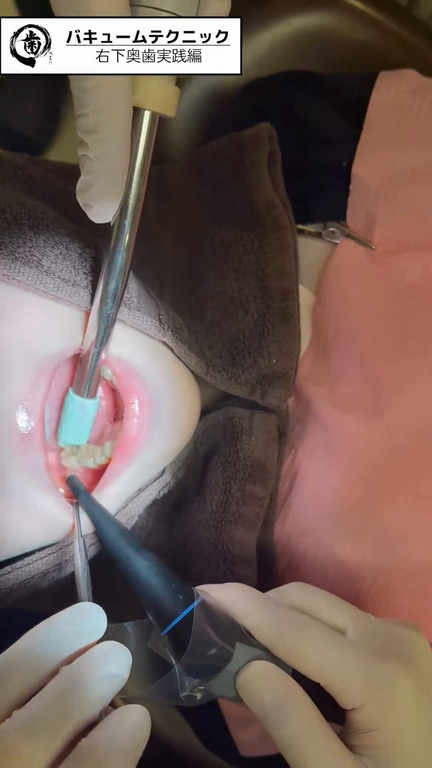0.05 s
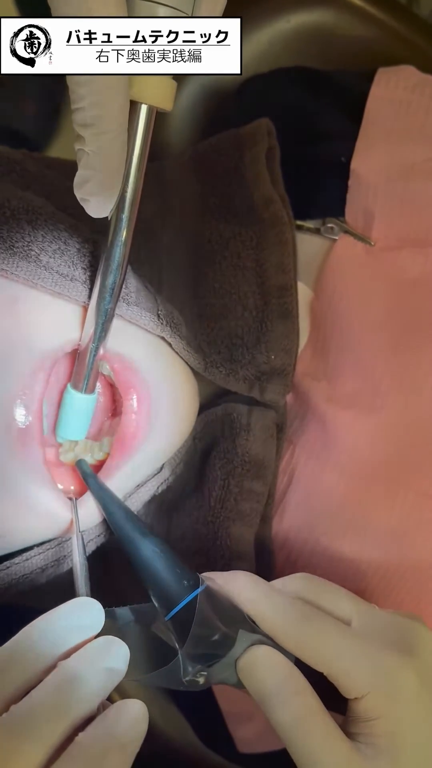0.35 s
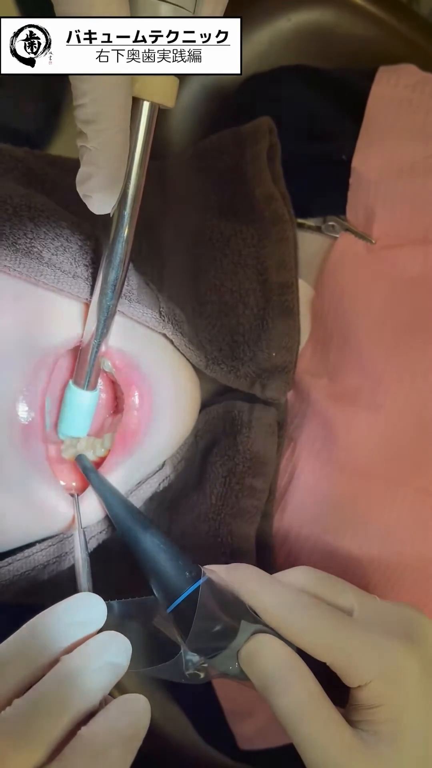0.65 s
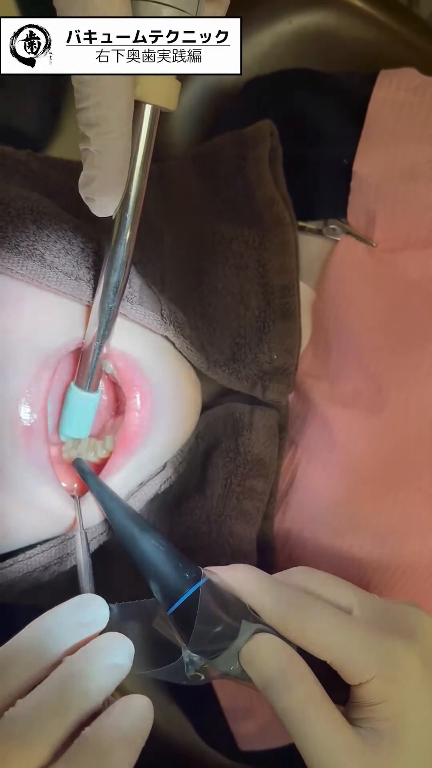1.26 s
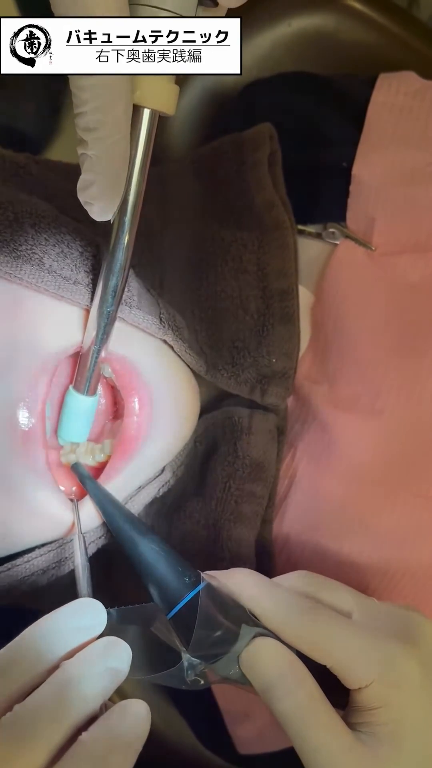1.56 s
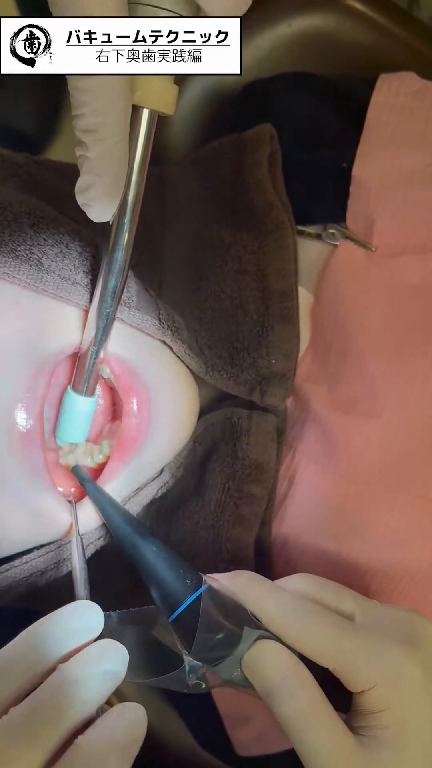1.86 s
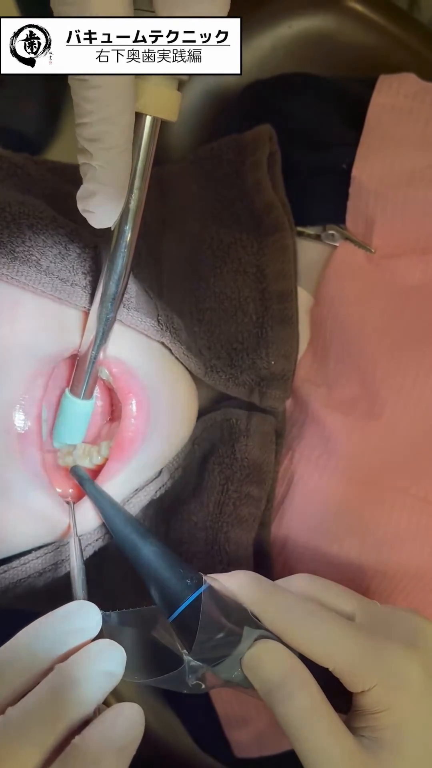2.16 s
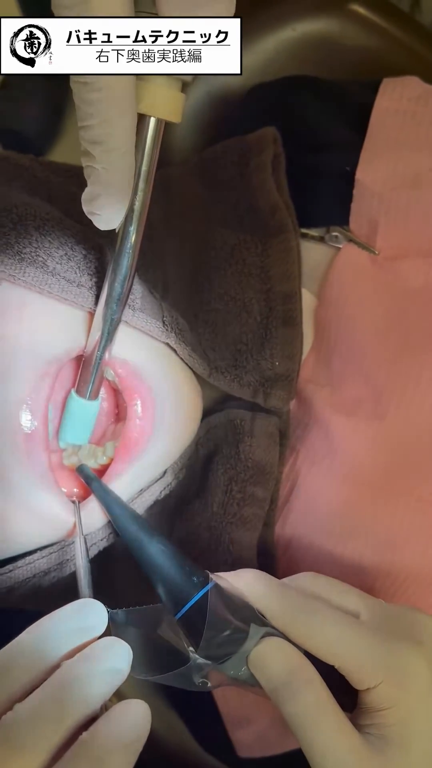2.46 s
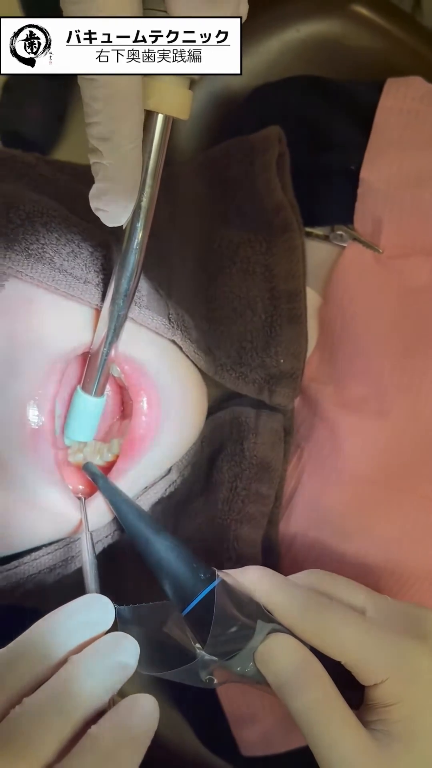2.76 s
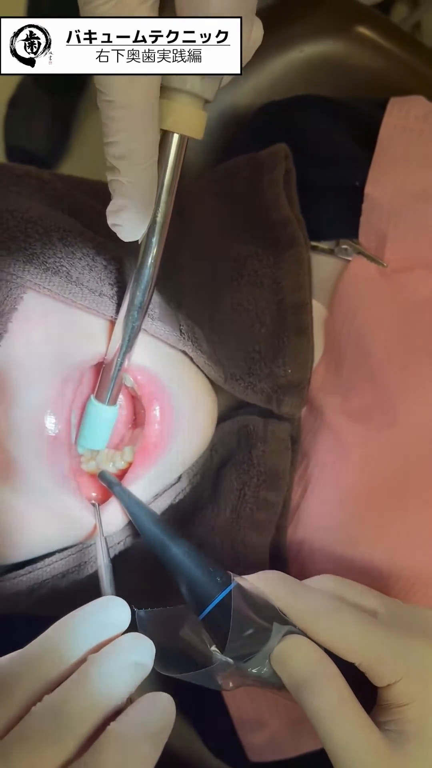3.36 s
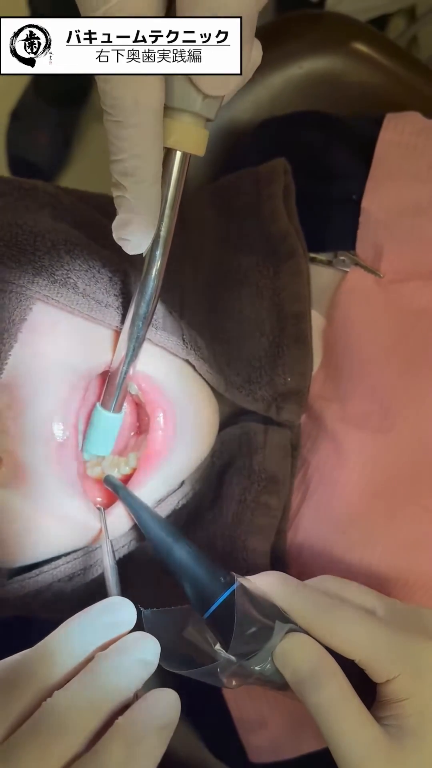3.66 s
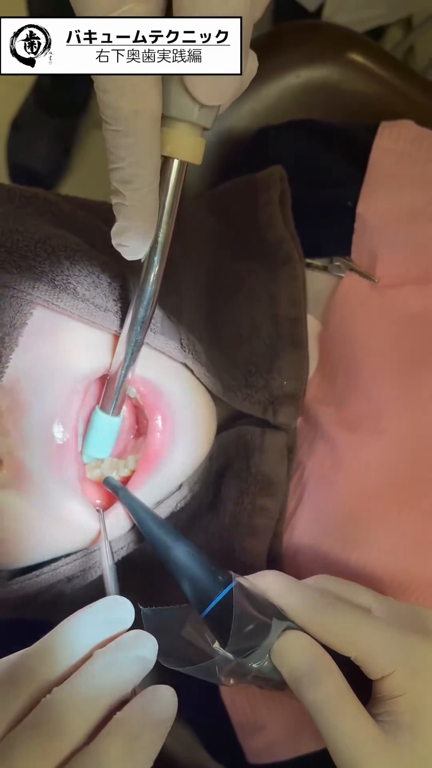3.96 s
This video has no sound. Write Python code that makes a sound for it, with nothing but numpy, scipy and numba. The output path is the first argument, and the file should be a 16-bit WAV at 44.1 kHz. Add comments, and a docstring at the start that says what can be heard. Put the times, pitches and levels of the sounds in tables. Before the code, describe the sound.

Close up in a clinic, dental suction draws air with a bright, ringing hiss. Water gulps briefly and builds to a sputtering slurp, which eases and holds steady as the hiss rises slightly in pitch.

```python
"""A dental suction tip draws air and water, close to two microphone ports that spread the treble.
From the start, air hisses over the rim and rings the tube, above the low rumble of the suction line.
Early on, four plugs of water gulp down the hose, and torn spray begins to slurp in surges in the
hollow around the tip. The slurp is loudest after about a second, then eases to a steady draw.
Near the end the tip shifts and the tube rings a little higher."""
import sys
import numpy as np
from scipy import signal
from scipy.fft import rfft, irfft
from scipy.io import wavfile
from scipy.ndimage import map_coordinates
from numba import njit

SR = 44100
rng = np.random.default_rng(int(sys.argv[2]) if len(sys.argv) > 2 else 0)


def unload_wav(signal):
    """Save mono or channel-first audio to the path in sys.argv[1] as 16-bit WAV at rate SR, clipped to [-1, 1]."""
    wavfile.write(
        sys.argv[1],
        SR,
        np.round(np.clip(np.atleast_2d(signal).T, -1, 1) * 32767).astype(np.int16),
    )


N = 176400
TIME_S, FREQ_HZ = np.arange(N) / SR, np.arange(N // 2 + 1) * SR / N


def gain(db):
    """Turn decibels into a number to multiply by."""
    return 10 ** (np.asarray(db) / 20)


def unit(x):
    """Scale a sound to an average power of 1."""
    return x / np.sqrt(np.mean(x ** 2))


def over_time(rows):
    """Join (time_s, value) rows with straight lines."""
    return np.interp(TIME_S, *np.array(rows, float).T)


def over_pitch(rows):
    """Join (pitch_hz, value) rows, giving each octave equal room."""
    hz, value = np.array(rows, float).T
    return np.interp(np.log(np.maximum(FREQ_HZ, 1)), np.log(hz), value)


def noise(colour):
    """Noise whose colour says how strong each pitch is."""
    return unit(irfft(rfft(rng.standard_normal(N)) * gain(over_pitch(colour)), N))


def flutter(depth_db, rate_hz):
    """A volume that wavers at random, mostly slower than rate_hz."""
    slow = FREQ_HZ / (FREQ_HZ + 2) / (1 + (FREQ_HZ / rate_hz) ** 2)
    waver = unit(irfft(rfft(rng.standard_normal(N)) * slow, N))
    return gain(depth_db * waver)


@njit
def band_pass(x, pitch_hz, width_hz):
    """Keep the sound near a pitch that may move."""
    out, band_state, low_state = np.empty(len(x)), 0., 0.
    for i in range(len(x)):
        step, damping = np.tan(np.pi * pitch_hz[i] / SR), width_hz / pitch_hz[i]
        band = (band_state + step * (x[i] - low_state)) / (1 + step * (step + damping))
        band_state = 2 * band - band_state
        low_state += 2 * step * band
        out[i] = damping * band
    return out


def ring(x, pitch_hz, width_hz):
    """Make a sound ring at one pitch by filtering it twice."""
    centre, width = pitch_hz * np.ones(N), float(width_hz)
    return band_pass(band_pass(x, centre, width), centre, width)


# How loud the rumble is: time_s, level_db
RUMBLE_LEVEL = [(0,-53),(.6,-48),(1.1,-49),(2,-57),(4,-62.5)]
# Its colour: pitch_hz, level_db
RUMBLE_COLOUR = [(20,-24),(42,-21),(66,-1),(100,-11),(200,-4),(500,-19.5),(1000,-59),(3000,-55)]

def line_rumble():
    """The suction line rumbles low in the background."""
    return noise(RUMBLE_COLOUR) * gain(over_time(RUMBLE_LEVEL))


# How loud the air in the tube is: time_s, relative_db
TUBE_LEVEL = [(0,-28.3),(.58,-28.8),(.62,-26),(.85,-27.5),(1.1,-28.3),(1.37,-30.7),(1.56,-29.4),(1.85,-30.2),(2.05,-28.3),(2.25,-28.3),(2.45,-29.7),(2.85,-30.7),(3.3,-31.6),(3.85,-30.3),(4,-30.6)]
# The colour the tube gives it: pitch_hz, level_db
TUBE_COLOUR = [(2500,-24.5),(2780,-26),(2930,-23),(3030,-23),(3130,-17),(3500,-17.5),(3870,-13),(4170,-20.5),(4500,-17.5),(5130,-12),(5550,-13.5),(6100,-17.5),(6450,-18),(7080,-12),(7650,-20.5),(8000,-4.5),(8400,-10),(8900,1.5),(9350,-7.5),(9900,-0.5),(10300,-1),(10850,-5),(11100,-10.5),(11700,-21.5),(13100,-23.5),(14700,-28),(15700,-17)]
# The tube rings higher as the tip shifts: time_s, pitch_ratio
TUBE_PITCH = [(0,1.005),(.7,.998),(3.1,1.012),(3.7,1.034),(4,1.037)]

def tube_hiss(boost_db=6):
    """Air swirls over the rim and rings the tube."""
    position = np.cumsum(over_time(TUBE_PITCH))  # reading the noise faster raises its pitch
    hiss = map_coordinates(noise(TUBE_COLOUR), [position], order=5, mode="wrap")
    return hiss * gain(over_time(TUBE_LEVEL) + boost_db)


# How loud the bright ring at the rim is: time_s, level_db
RIM_LEVEL = [(0,-25.5),(.3,-27),(.5,-30),(.9,-27.5),(1.3,-35),(1.6,-37),(2.15,-28.5),(2.8,-30.5),(3.35,-34),(3.7,-30),(4,-31.5)]
# A thin sizzle, strongest while the tip is still dry: time_s, level_db
SIZZLE_LEVEL = [(0,-26.5),(.35,-28.5),(.6,-26),(1.05,-31.5),(1.3,-33),(1.6,-31.5),(2.25,-40),(2.8,-38),(4,-49)]
# Its colour: pitch_hz, level_db
SIZZLE_COLOUR = [(2700,-27),(2980,9.5),(3200,0),(3500,-39),(4500,-27),(5600,-30),(5900,-18),(6180,12),(6450,-4),(7300,7),(7800,7),(8400,-2),(9100,-25),(9500,-3),(10000,10),(10700,11.5),(11000,16),(11600,7.5),(12200,-1),(13500,-13),(14800,-6),(15700,-30)]

def air():
    """Swirling air hisses in the tube, rings at the rim and sizzles, all wavering together."""
    tube = tube_hiss()
    rim = unit(ring(rng.standard_normal(N), pitch_hz=10360, width_hz=820)) * gain(over_time(RIM_LEVEL))
    sizzle = noise(SIZZLE_COLOUR) * gain(over_time(SIZZLE_LEVEL))
    return (tube + rim + sizzle) * flutter(depth_db=0.72, rate_hz=90)


# How loud the rush in the hose is: time_s, relative_db
RUSH_LEVEL = [(0,-42.5),(.15,-52),(.2,-37.5),(.38,-40.5),(.55,-35),(.7,-29.5),(1.1,-31.5),(1.7,-29.5),(2.4,-32.5),(4,-33)]
# Its colour: pitch_hz, level_db
RUSH_COLOUR = [(30,-45),(100,-21),(220,-10.5),(500,-10),(680,-14.5),(850,-11.5),(1050,-2.5),(1600,1.5),(1900,2),(2200,0.5),(2400,-6.5),(2750,-12.5),(3500,-7.5),(6000,-32)]

def hose_rush(sputter, boost_db=1.5):
    """Wet air rushes down the hose, sputtering along with the spray."""
    return noise(RUSH_COLOUR) * sputter * gain(over_time(RUSH_LEVEL) + boost_db)


# Plugs of water going down the hose: start_s, level_db, fade_s
GULPS = [(0.166,-25,0.015),(0.393,-27,0.0056),(.575,-30,0.0094),(.618,-33,0.011)]

def gulps(start_hz=647, end_hz=51.6, fall_s=0.0045, rise_s=0.00047):
    """Each plug of water gives a short thump that falls quickly in pitch."""
    out = np.zeros(N)
    for start_s, level_db, fade_s in GULPS:
        age = np.maximum(TIME_S - start_s, 0)
        cycles = end_hz * age + (start_hz - end_hz) * fall_s * (1 - np.exp(-age / fall_s))
        shape = (1 - np.exp(-age / rise_s)) * np.exp(-age / fade_s)
        out += gain(level_db) * shape * np.sin(2 * np.pi * cycles)
    return out


# The steady draw of water torn up at the tip: time_s, relative_db
WATER_LEVEL = [(0,-37),(.15,-37),(.2,-31),(.35,-30.5),(.56,-28),(.61,-22.3),(.8,-20.2),(1,-20.3),(1.03,-23),(1.11,-18.6),(1.3,-21.2),(1.55,-23.3),(2,-24.4),(2.4,-23.6),(2.7,-25.3),(3.2,-25.9),(3.55,-25.1),(4,-26.7)]
# Surges as the tip catches more water: start_s, hold_s, relative_db
SURGES = [(.168,.026,-26),(.215,.022,-27.5),(.396,.073,-21.3),(.505,.035,-27),(.577,.025,-22.5),(.655,.025,-22),(.9,.025,-22.5),(1.047,.045,-18.8)]

def water_flow(rise_s=0.0037, fade_s=0.018, trim_db=-0.5):
    """How strong the spray is: a steady draw plus surges that start sharply, hold and fade."""
    power = gain(over_time(WATER_LEVEL)) ** 2
    for start_s, hold_s, level_db in SURGES:
        rise = np.clip((TIME_S - start_s) / rise_s, 0, 1)
        fade = np.exp(-np.maximum(TIME_S - start_s - hold_s, 0) / fade_s)
        power += (gain(level_db) * rise * fade) ** 2
    return np.sqrt(power) * gain(trim_db)


def spray(drops_per_s=1300, spread_db=3.3, biggest_db=10):
    """Torn water: tiny droplet clicks of random size, mixed with an equally strong hiss."""
    clicks = (rng.random(N) < drops_per_s / SR) * rng.choice([-1, 1], N)
    sizes = gain(np.minimum(spread_db * rng.exponential(size=N), biggest_db))
    return unit(clicks * sizes) + rng.standard_normal(N)


# The middle pitch of the hollow around the tip: time_s, pitch_hz
HOLLOW_PITCH = [(0,1350),(.35,1365),(.55,1415),(.75,1365),(.9,1335),(1.15,1355),(1.5,1415),(2.2,1435),(4,1450)]
# The hollow's notes around that pitch: pitch_ratio, width_hz, relative_db
HOLLOW_NOTES = [(.86,280,-2),(1,206,2),(1.07,233,-0.5)]
# The tube's notes, before TUBE_PITCH moves them: pitch_hz, width_hz, relative_db
TUBE_NOTES = [(2992,128,-7),(3156,150,-7),(5096,236,-7.5),(8180,370,-6.5),(9300,420,-25)]

def slurp():
    """Sputtering spray rings the hollow and the tube while wet air rushes down the hose."""
    sputter = flutter(depth_db=1.0, rate_hz=70)
    droplets = spray() * sputter
    hollow = sum(gain(db) * ring(droplets, ratio * over_time(HOLLOW_PITCH), width_hz) * (-1) ** k
                 for k, (ratio, width_hz, db) in enumerate(HOLLOW_NOTES))  # every other wave is flipped
    mist = rng.standard_normal(N) * sputter
    tube = sum(gain(db) * ring(mist, pitch_hz * over_time(TUBE_PITCH), width_hz)
               for pitch_hz, width_hz, db in TUBE_NOTES)
    return unit(hollow + tube) * water_flow() + hose_rush(sputter)


def with_echoes(x, level_db=-13, fade_s=0.017):
    """Nearby surfaces bounce a little of the sound back almost at once."""
    age = np.arange(SR // 20) / SR
    echoes = rng.standard_normal(len(age)) * np.exp(-age / fade_s) * (age > .002)
    return x + gain(level_db) * signal.fftconvolve(x, echoes / np.linalg.norm(echoes))[:N]


# How far the wave at the left port runs ahead: pitch_hz, lead_radians
LEFT_LEAD = [(100,0.05),(1200,-.2),(1700,0),(2800,0.22),(3450,0.84),(4450,1),(4900,3.2),(5300,5.2),(5800,6.2),(6300,5.4),(7200,7.6),(8100,8.6),(8900,9.28),(9400,9.4),(9750,10),(11400,11.38),(12000,12.5),(13700,12.6),(15500,15.7)]
# How much louder the left port is: pitch_hz, left_minus_right_db
LEFT_BALANCE = [(200,0.5),(450,0.3),(700,-1),(1200,0.5),(1380,-3.5),(1600,1),(2600,-0.8),(3500,1),(4300,-3),(4600,1),(5050,-2),(5600,0)]
# How alike the two ports sound: pitch_hz, likeness_0_to_1
PORT_LIKENESS = [(250,1),(700,0.89),(1200,0.99),(1900,1),(2700,0.87),(3100,0.8),(4400,0.95),(5100,0.69),(6000,0.97),(8100,0.95),(9000,1),(10700,0.96),(14000,.66),(15500,0.93)]

def microphone_ports(direct, scattered):
    """Two close openings hear the direct sound out of step; scattered sound makes them less alike."""
    likeness = np.clip(over_pitch(PORT_LIKENESS), 0, 1)
    shared = rfft(direct) * np.sqrt((1 + likeness) / 2)
    apart = rfft(scattered) * np.sqrt((1 - likeness) / 2)
    lead = np.exp(1j * over_pitch(LEFT_LEAD))
    balance = gain(over_pitch(LEFT_BALANCE) / 2)
    left = irfft((shared + apart) * lead * balance, N)
    right = irfft((shared - apart) / balance, N)
    return np.array([left, right])


def scene():
    """Rumble, hiss, gulps and slurp reach the two ports."""
    direct = line_rumble() + with_echoes(air()) + gulps() + slurp()
    scattered = air() + slurp()  # the same sources with fresh randomness
    return microphone_ports(direct, scattered)


def record(dry):
    """Cut away the deepest rumble and the very top of the treble."""
    low_hz, top_hz = 38, 15650
    low_cut = signal.butter(2, low_hz, "high", fs=SR, output="sos")
    top_cut = signal.ellip(12, .1, 80, top_hz, fs=SR, output="sos")
    return signal.sosfilt(top_cut, signal.sosfilt(low_cut, dry))


dry = scene()
out = record(dry)
unload_wav(out)
```